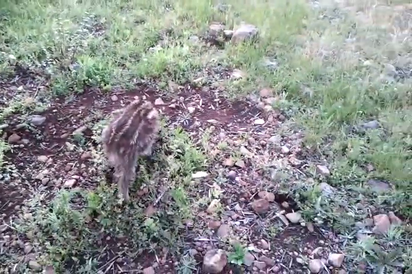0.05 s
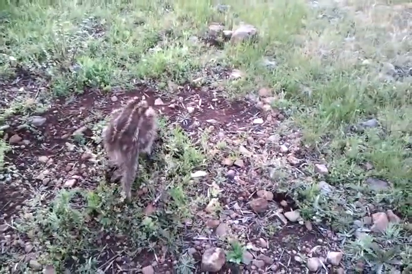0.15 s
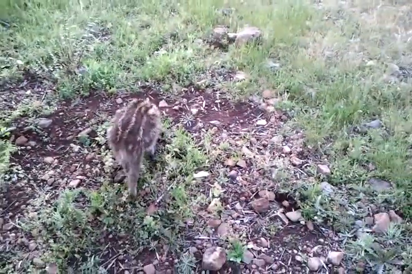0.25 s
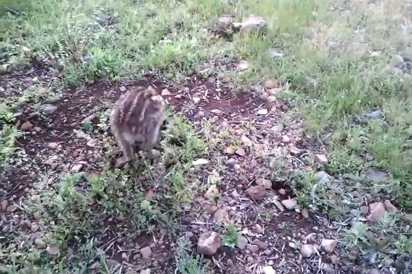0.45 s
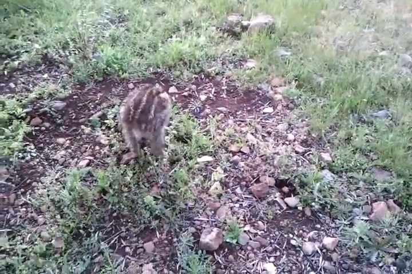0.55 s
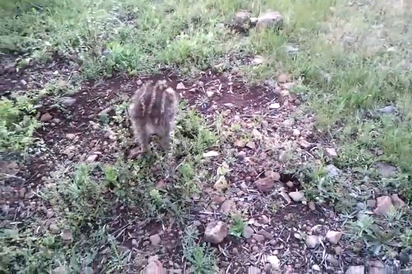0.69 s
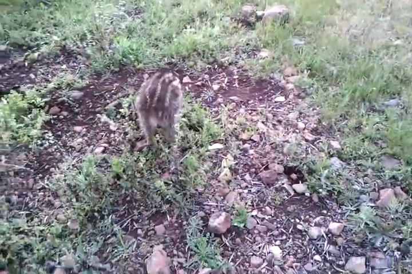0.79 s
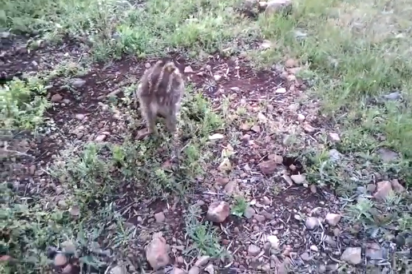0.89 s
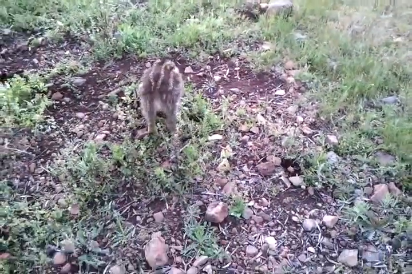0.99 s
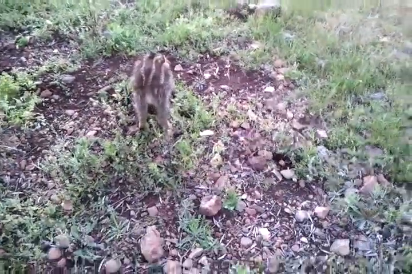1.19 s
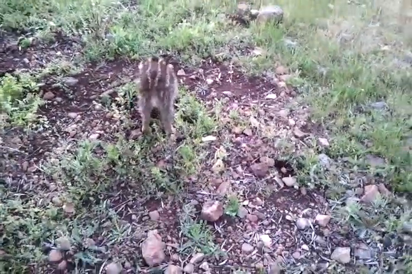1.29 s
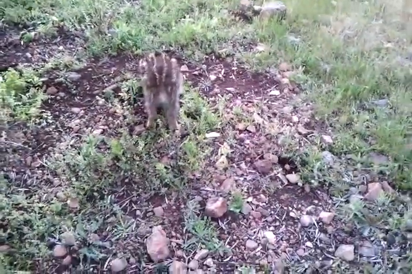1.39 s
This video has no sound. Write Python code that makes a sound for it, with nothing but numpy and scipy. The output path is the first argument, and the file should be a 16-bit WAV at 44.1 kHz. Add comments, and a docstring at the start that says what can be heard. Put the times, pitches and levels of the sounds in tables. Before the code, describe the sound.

Outdoors, a piglet grunts with a brief rasp, then grunts again, duller, amid light crunching of soil and leaves. Low wind buffets the microphone, while faint insects chirp and a distant bird whistles once near the end.

```python
"""On stony, weedy ground outdoors, a piglet roots about and grunts twice. Its throat makes muffled
pops, the first run opening into a short rasp, and a puff through the snout ends each grunt.
Grit ticks, soil crunches and leaves rustle. A low rumble with dull thumps, probably air on the
microphone, swells and sinks. Insects chirp over a faint hiss, and a far bird gives one thin whistle."""
import sys
import numpy as np
from scipy import signal
from scipy.fft import rfft, irfft
from scipy.io import wavfile
from scipy.ndimage import uniform_filter1d

SR = 44100
rng = np.random.default_rng(int(sys.argv[2]) if len(sys.argv) > 2 else 0)


def generate_wav(sig):
    """Save sig (samples, or channels by samples) to the path in sys.argv[1] as 16-bit PCM at SR."""
    pcm = np.round(np.clip(np.atleast_2d(sig).T, -1, 1) * 32767).astype(np.int16)
    wavfile.write(sys.argv[1], SR, pcm)


N = 63945
T = np.arange(N) / SR

# Outdoor hiss. Each row: frequency in Hz, relative level in dB.
HISS_TONE = [(120, -37), (200, -2), (336, -0.5), (481, -9), (529, -5), (847, -10.5), (931, -11),
             (1720, -12), (3880, -15.5), (4760, -17), (5480, -8.5), (8110, -26), (8500, -39), (11000, -64),
             (18700, -120)]
# Far insects. Each row: pitch in Hz, width in Hz, level in dB, flutter in dB.
FAR_INSECTS = [(4960, 500, -74, 1.3), (7980, 62, -86.5, 1.8)]
# The rumble's swells. Each row: time in seconds, relative levels of deep part and bass in dB.
SWELLS = [(0.0, -48, -67), (0.052, -53.5, -79), (0.156, -41, -61.5), (0.18, -49.5, -63.5),
          (0.278, -36.5, -51), (0.33, -29.5, -53.5), (0.35, -33.5, -56), (0.378, -34.5, -48),
          (0.428, -26.5, -51.5), (0.46, -25, -32.5), (0.504, -28.5, -50.5), (0.556, -50, -62),
          (0.576, -49.5, -76), (0.702, -58.5, -71), (0.754, -45.5, -73.5), (0.876, -49, -74.5),
          (1.078, -35, -39), (1.102, -40.5, -54.5), (1.182, -39, -61), (1.292, -54, -75.5),
          (1.336, -41, -62), (1.45, -52, -76)]
# The tone of those two parts. Each row: frequency in Hz, relative level in dB.
DEEP_TONE = [(15, -12.5), (28, 2), (48, 1.5), (72, -5), (98, -8.5), (125, -21), (200, -43), (400, -83)]
BASS_TONE = [(80, -28.5), (120, -9.5), (155, 5.5), (215, -3.5), (300, -12.5), (420, -28), (800, -63)]
# Grit snapping under hooves and snout. Each row: start in seconds, relative level in dB.
GRIT_TICKS = [(0.013, -47), (0.248, -57), (0.2623, -47), (0.27, -56.5), (0.2906, -55), (.349, -47),
              (0.817, -58), (.887, -52), (0.938, -54.5), (0.971, -55), (0.9863, -46), (0.9946, -45.5),
              (1.010, -40.5), (1.035, -67), (1.321, -61)]
# Soil crunching and leaves brushing the piglet. Each row: time in seconds, level in dB.
SOIL_LEVEL = [(0, -86), (.1, -74), (.2, -67), (.3, -67), (.36, -70.5), (.42, -73), (.58, -75.5), (.63, -72),
              (.7, -77.5), (.82, -69), (.86, -87), (.96, -68.5), (1.0, -75), (1.1, -68.5), (1.18, -78),
              (1.34, -76.5), (1.4, -90)]
LEAF_LEVEL = [(0, -58.5), (.018, -53), (.05, -81), (.2, -66.5), (.27, -76), (.37, -64), (.45, -81),
              (.95, -82.5), (1.01, -51), (1.055, -53), (1.09, -70), (1.2, -68.5)]
# Their tone. Each row: frequency in Hz, relative level in dB.
SOIL_TONE = [(300, -8), (700, 2), (1600, 5.5), (3500, -2), (5800, 2.5), (7200, -3.5), (9000, -31)]
LEAF_TONE = [(1500, -12.5), (4000, -16.5), (6300, -11.5), (7400, 0), (8600, -17.5), (10000, 0)]
# The rasp's effort, one list per grunt. Each row: time in seconds, relative level in dB.
EFFORT = [
    [(.14, -63), (.175, -54.5), (.213, -59), (.245, -52.5), (.27, -46), (.281, -56.5), (.3, -62),
     (.33, -86)],
    [(.98, -78), (.997, -66.5), (1.025, -58.5), (1.05, -67), (1.085, -60.5), (1.12, -69), (1.16, -63.5)],
]
# Where the throat rings. Each row: frequency in Hz, width in Hz, relative level in dB.
THROAT_RINGS = [(310, 37, 4.5), (459, 61, 2), (552.6, 72, 2.5), (718, 180, 1), (1000, 160, -2.5),
                (1246, 160, -15), (1552, 130, -3.5), (2790, 302, 0), (5560, 6600, -10)]
# The mouth opening. Each row: time in seconds, frequency in Hz above which it muffles the voice.
MOUTH_OPENING = [(.14, 360), (.2, 480), (.216, 680), (.229, 1600), (.252, 1750), (.268, 3200), (.3, 3000),
                 (.98, 764), (1.1, 950)]
# Throat pops. Each row: start in seconds, peak in dB, pitch in Hz, upper ring in dB from that peak.
THROAT_POPS = [(0.1448, -41, 265, -19), (.1968, -37, 327, -37), (.2152, -48, 410, -21),
               (.2255, -42.5, 515, -22), (.9915, -39.5, 370, -2.5), (1.0358, -36.5, 289, -11),
               (1.0455, -39, 468, -9), (1.0585, -36.5, 235, -33), (1.0755, -28.5, 363, -14)]
# Snout scrapes. Each row: middle in seconds, level in dB.
SCRAPES = [(.208, -70), (.265, -66), (.362, -68), (.63, -69)]
# Snout puffs. Each row: loudest moment in seconds, level in dB, pitch in Hz.
PUFFS = [(.295, -61, 1126), (1.099, -60.5, 820)]
# Thumps in the rumble. Each row: start in seconds, peak in dB, pitch in Hz.
THUMPS = [(0.317, -36.5, 124.5), (0.37, -32.5, 123.4), (.453, -39, 195), (0.4586, -42.5, 282),
          (.460, -24, 111.4), (1, -36, 93.3), (1.055, -29, 88.5), (1.174, -37.5, 68.4)]
# Insect chirps. Each row: start in seconds, peak in dB, starting pitch in Hz.
CHIRPS = [(.409, -64.5, 5160), (.521, -76, 4980), (0.645, -59.5, 4940), (.688, -59.5, 4930),
          (.730, -57.5, 4970), (0.773, -57.5, 5030), (0.828, -65, 5040), (.912, -66, 5250),
          (1.21, -57, 4920), (1.248, -55.5, 4960), (1.291, -54, 4960), (1.337, -54.5, 4940),
          (1.393, -63.5, 5260)]
# The bird's whistle. Each row: time in seconds, pitch in Hz, level in dB.
WHISTLE = [(1.25, 2250, -82), (1.285, 2235, -71.5), (1.345, 2224, -69), (1.375, 2165, -76.5)]


def from_db(db):
    """Turn decibels into a multiplier."""
    return 10 ** (np.asarray(db) / 20)


def rms_one(x):
    """Scale a sound so its average level (rms) is 1."""
    return x / np.sqrt(np.mean(x ** 2) + 1e-20)


def in_time(rows):
    """Join a table's rows into one curve over time per value column."""
    s, *columns = np.transpose(rows)
    return [np.interp(T, s, c) for c in columns]


def band(x, low_hz, high_hz, order=2):
    """Keep the sound between two frequencies."""
    edges = [max(low_hz, 10), min(high_hz, .45 * SR)]
    return signal.sosfilt(signal.butter(order, edges, "band", fs=SR, output="sos"), x + 1e-18)


def resonate(x, hz, width_hz):
    """Let a sound ring around one frequency."""
    return band(x, hz - width_hz / 2, hz + width_hz / 2)


def colour(x, tone):
    """Shape a sound with a tone table, at average level 1."""
    hz, db = np.transpose(tone)
    bins = np.maximum(np.fft.rfftfreq(N, 1 / SR), 1)
    gain = from_db(np.interp(np.log(bins), np.log(hz), db))
    return rms_one(irfft(rfft(x) * gain, N))


def drift(per_s):
    """Wander to a new random value per_s times a second."""
    points = rng.standard_normal(1000)
    return np.interp(T * per_s, np.arange(len(points)), points)


def even(x, window_s):
    """Hold a random sound's level near 1."""
    return x / np.sqrt(uniform_filter1d(x ** 2, max(int(window_s * SR), 2)) + 1e-9)


def grains(per_s, spread_db):
    """Random clicks of uneven size."""
    clicks = (rng.random(N) < per_s / SR) * rng.choice([-1, 1], N)
    return clicks * from_db(spread_db * np.minimum(rng.exponential(1, N), 3))


def blip(s, hz, rise_cycles):
    """A soft ring of a few cycles, starting at s seconds."""
    age = np.maximum(T - s, 0) * hz / rise_cycles
    swell = (age * np.exp(1 - np.minimum(age, 20))) ** 3.66
    return swell * np.sin(2 * np.pi * (hz * (T - s) + rng.random()))


def meadow():
    """Far insects shrill in narrow bands over an even hiss."""
    insects = 0
    for hz, width, db, flutter_db in FAR_INSECTS:
        level = from_db(db + flutter_db * drift(40))
        insects += level * rms_one(resonate(rng.standard_normal(N), hz, width))
    return insects + from_db(-69.5) * colour(rng.standard_normal(N), HISS_TONE)


def rumble(deep_trim_db=-1, bass_trim_db=-4.5):
    """Lumpy low buffeting; strong swells reach higher into the bass."""
    deep_db, bass_db = in_time(SWELLS)
    deep = even(colour(rng.standard_normal(N), DEEP_TONE), .06)
    bass = even(colour(rng.standard_normal(N), BASS_TONE), .06)
    return from_db(deep_db + deep_trim_db) * deep + from_db(bass_db + bass_trim_db) * bass


def ground(tick_fade_s=.00062):
    """Grit snaps in dry ticks; soil and leaves crackle with many tiny clicks."""
    ticks = sum(from_db(db) * (T >= s) * np.exp(-abs(T - s) / tick_fade_s) for s, db in GRIT_TICKS)
    grit = band(ticks * rng.standard_normal(N), 400, 11000, order=1)
    soil = from_db(in_time(SOIL_LEVEL)[0]) * colour(grains(per_s=900, spread_db=7.5), SOIL_TONE)
    leaves = from_db(in_time(LEAF_LEVEL)[0]) * colour(grains(per_s=2400, spread_db=4), LEAF_TONE)
    return grit + soil + leaves


def rasp(pitch_hz=271.1, wobble=.2, breathiness=.36):
    """Uneven pulses and rushing air ring the throat; the opening mouth lets higher rings out."""
    cycles = np.cumsum(pitch_hz * np.exp(wobble * drift(200))) / SR
    pulses = np.diff(np.floor(cycles), prepend=0)  # one click per cycle
    pulses = rms_one(pulses * from_db(4.5 * drift(250)))
    breath = rms_one(rng.standard_normal(N) * np.exp(-3 * (cycles % 1)))
    source = pulses + breathiness * breath
    mouth_hz, = in_time(MOUTH_OPENING)
    voice = 0
    for hz, width, db in THROAT_RINGS:
        muffling = np.hypot(1, (hz / mouth_hz) ** 5)
        voice += from_db(db) * even(resonate(source, hz, width), .04) / muffling
    effort = sum(from_db(in_time(grunt)[0]) * (T > grunt[0][0]) * (T < grunt[-1][0]) for grunt in EFFORT)
    return rms_one(voice) * effort


def pops(upper_hz=700):
    """Each slow release of the throat makes a low ring and a weaker one above it."""
    out = np.zeros(N)
    for s, db, hz, upper_db in THROAT_POPS:
        low = blip(s, hz, rise_cycles=1.145)
        upper = from_db(upper_db) * blip(s, upper_hz, rise_cycles=1.4)
        out += from_db(db) * (low + upper)
    return out


def echo(x, fade_s=.21, low_hz=648, high_hz=1530):
    """The ground and bushes throw back a weak, dull tail."""
    tail = band(rng.standard_normal(N), low_hz, high_hz) * from_db(-60 * T / fade_s) * (T > .006)
    tail /= np.sqrt(np.sum(tail ** 2) * SR / (2 * high_hz))
    return from_db(-7.5) * signal.fftconvolve(x, tail)[:N]


def scrapes(half_length_s=.012):
    """Each push of the snout through dry litter drags out a bright cluster of clicks."""
    push = sum(from_db(db) * np.exp(-((T - s) / half_length_s) ** 2) for s, db in SCRAPES)
    return push * rms_one(resonate(grains(per_s=2500, spread_db=7.5), hz=5700, width_hz=1700))


def puffs(rise_s=.018, fall_s=.02):
    """Air rings the snout on its way out and dies away."""
    out = np.zeros(N)
    for s, db, hz in PUFFS:
        swell = np.exp(np.minimum((T - s) / rise_s, (s - T) / fall_s))
        air = even(resonate(rng.standard_normal(N), hz, width_hz=380), .02)
        out += from_db(db) * swell * air
    return out


def thumps():
    """Soft, deep bumps within the rumble."""
    return sum(from_db(db) * blip(s, hz, rise_cycles=1.33) for s, db, hz in THUMPS)


def chirps(length_s=.026, fall_hz=702):
    """Insects make short pure notes that swell and slide down."""
    out = np.zeros(N)
    for s, db, hz in CHIRPS:
        progress = np.clip((T - s) / length_s, 0, 1)
        swell = np.sin(np.pi * progress ** .77) ** 2
        pitch = hz - fall_hz * progress ** 1.8
        out += from_db(db) * swell * np.sin(2 * np.pi * np.cumsum(pitch) / SR)
    return out


def bird():
    """One thin whistle that droops at its end."""
    hz, db = in_time(WHISTLE)
    singing = (T > WHISTLE[0][0]) * (T < WHISTLE[-1][0])
    return from_db(db) * singing * np.sin(2 * np.pi * np.cumsum(hz) / SR)


def scene():
    """The piglet, the meadow and the rumble in one channel."""
    grunts = pops() + rasp()
    piglet = grunts + puffs() + echo(grunts) + ground() + scrapes()
    return (piglet + chirps() + bird() + meadow() + rumble() + thumps())[None]


def record(dry):
    """Cut the highest treble steeply, leaving almost nothing above 9100 Hz."""
    return signal.sosfilt(signal.cheby2(16, 50, 9100, fs=SR, output="sos"), dry)


dry = scene()
out = record(dry)
generate_wav(out)
```